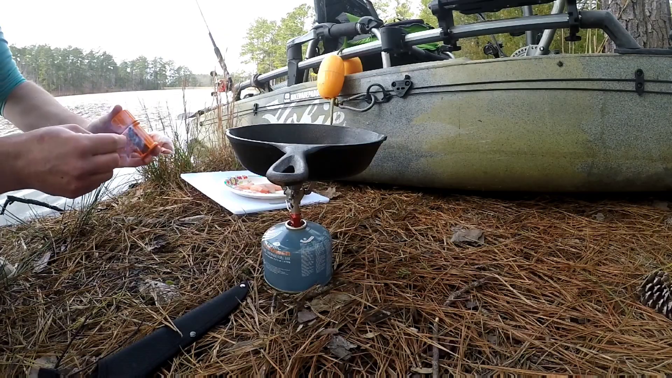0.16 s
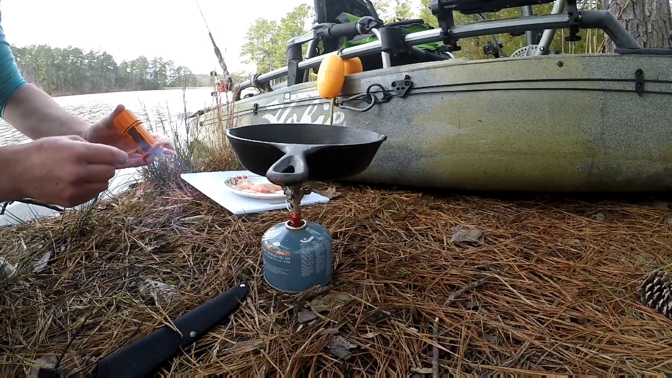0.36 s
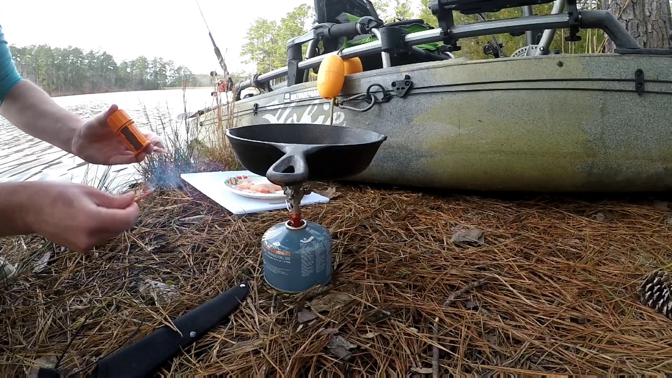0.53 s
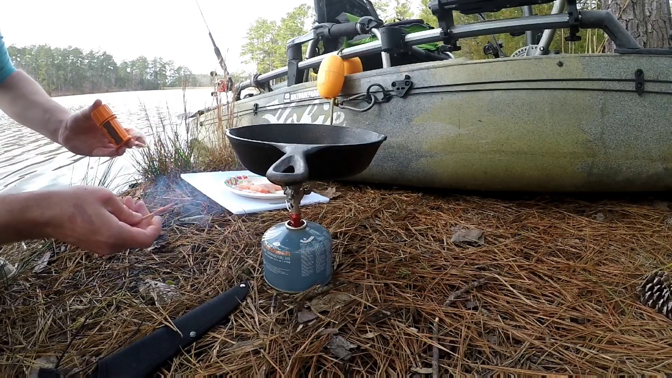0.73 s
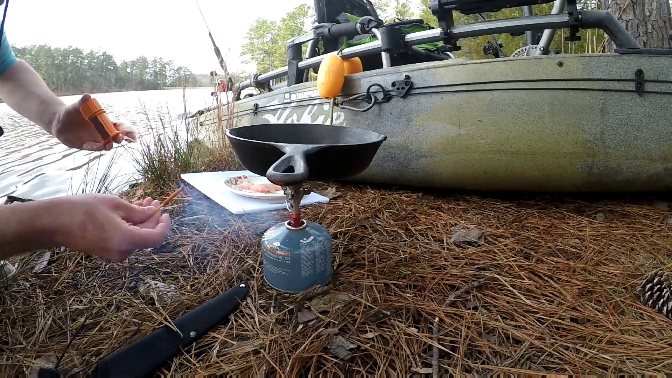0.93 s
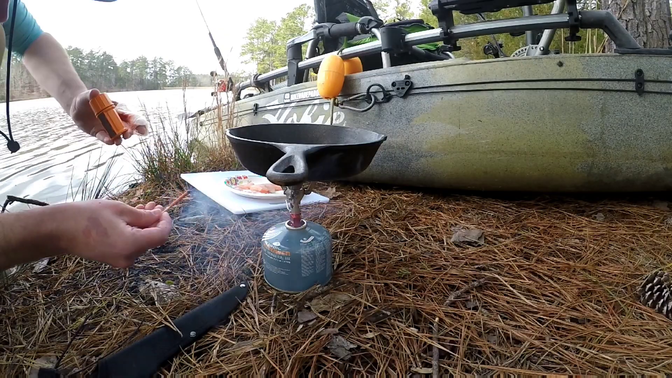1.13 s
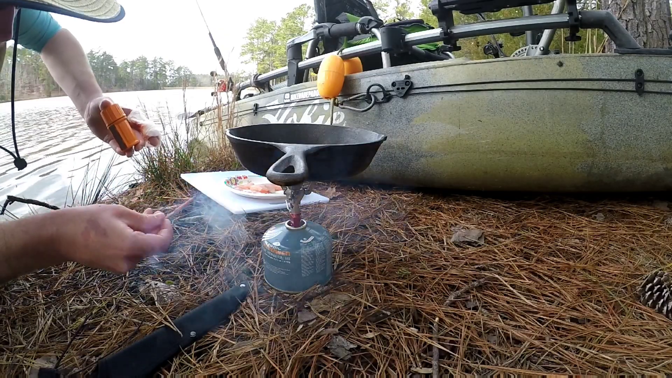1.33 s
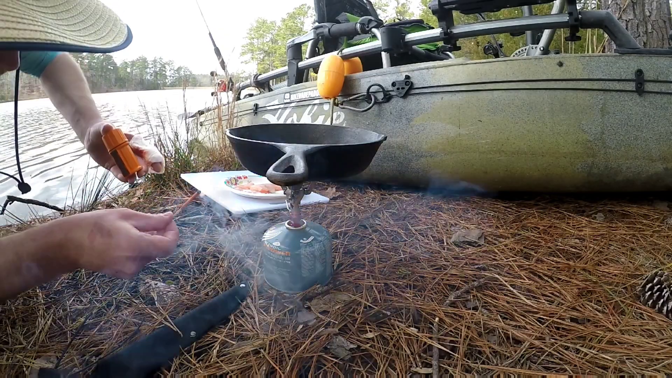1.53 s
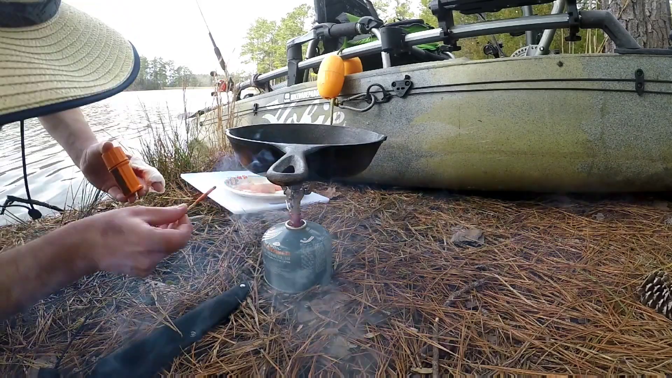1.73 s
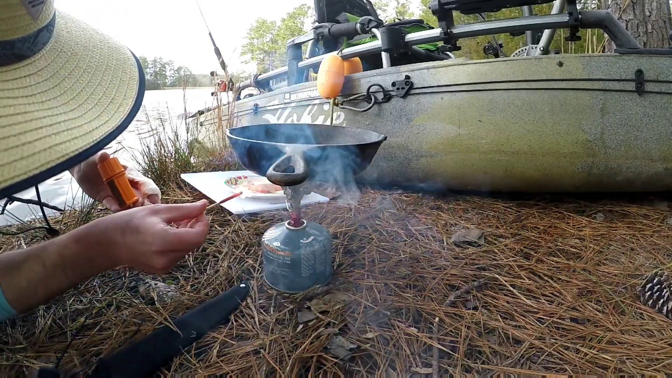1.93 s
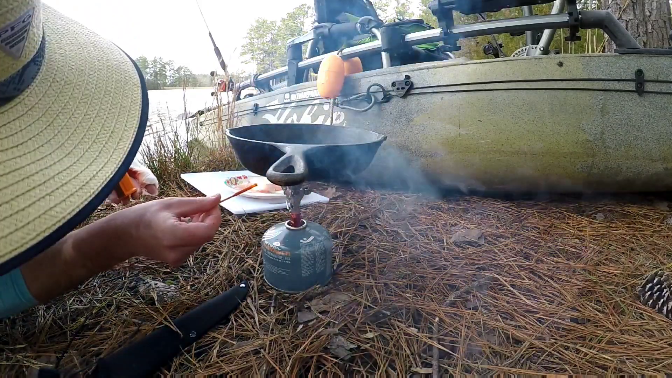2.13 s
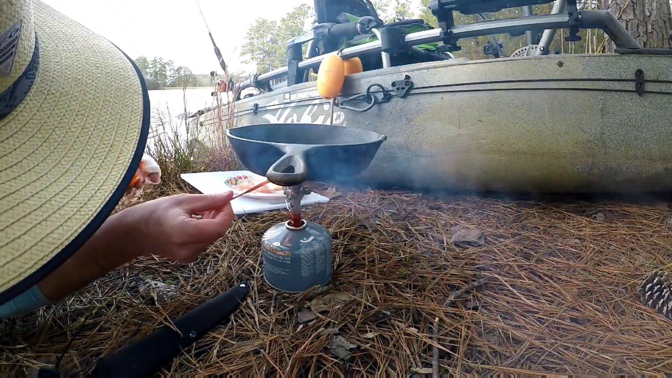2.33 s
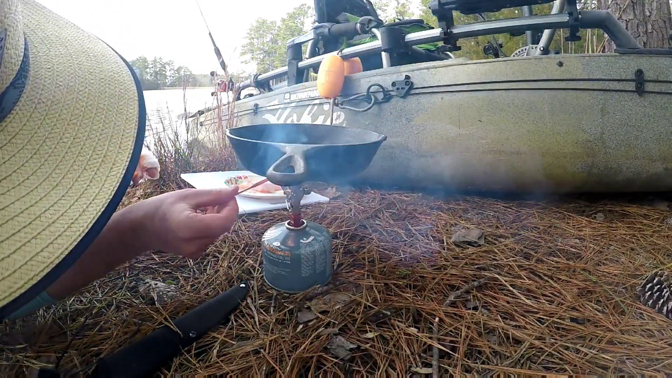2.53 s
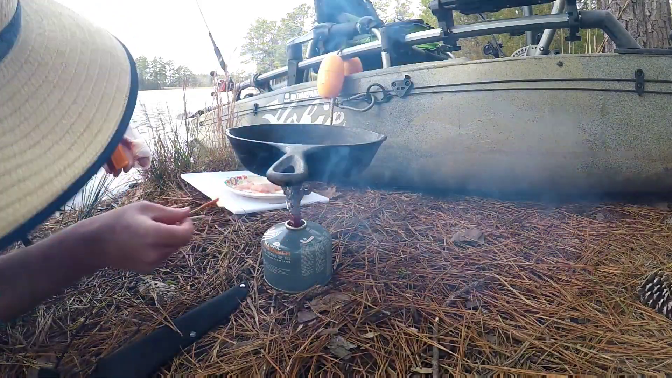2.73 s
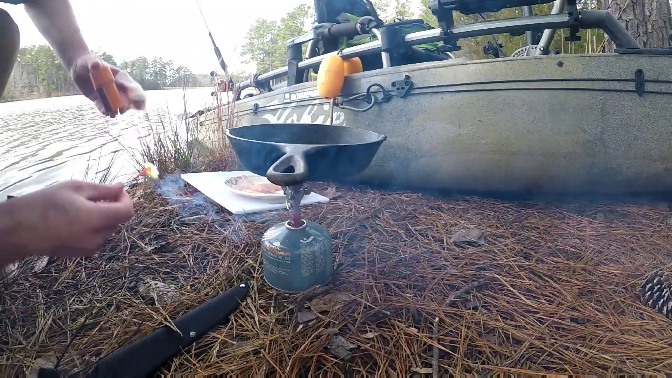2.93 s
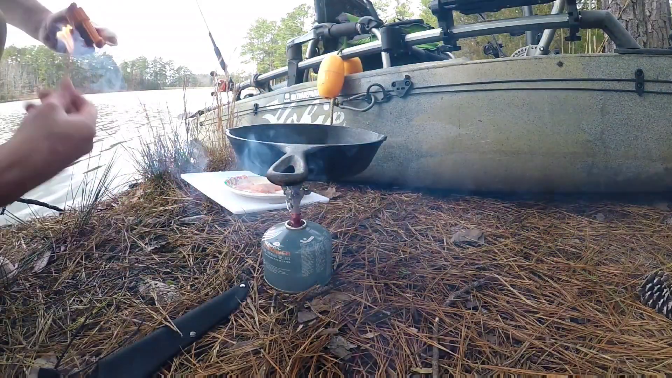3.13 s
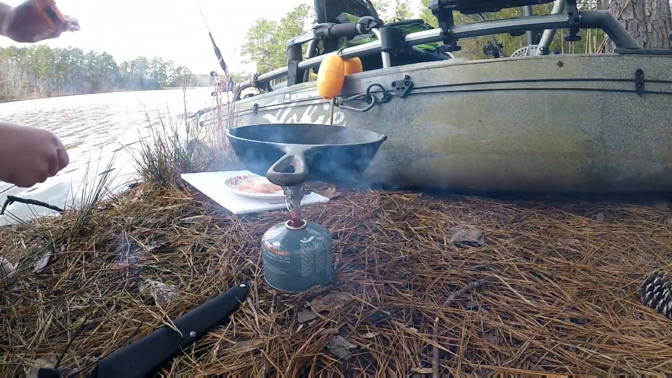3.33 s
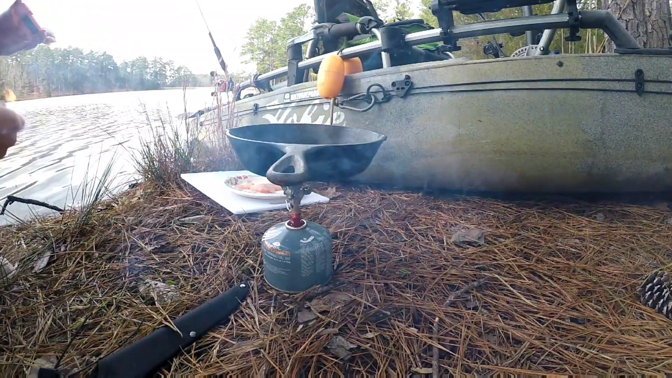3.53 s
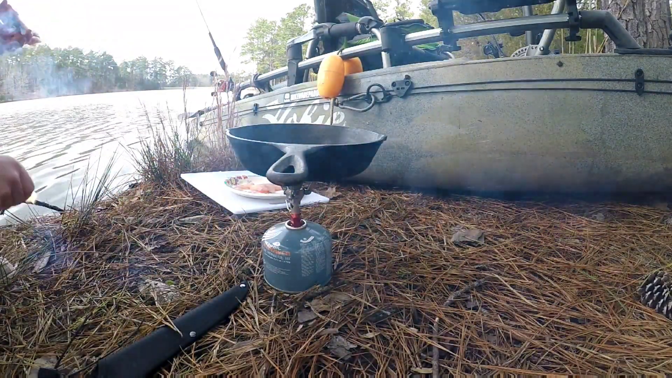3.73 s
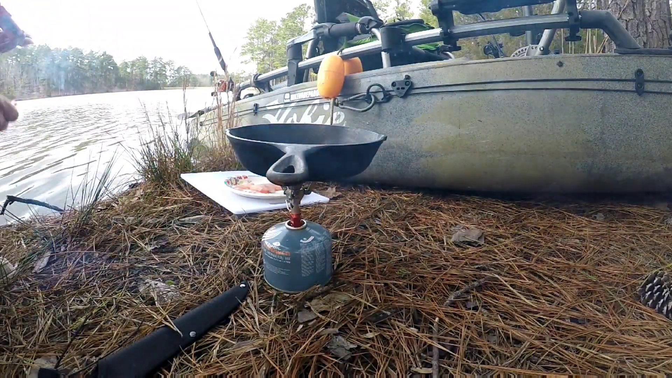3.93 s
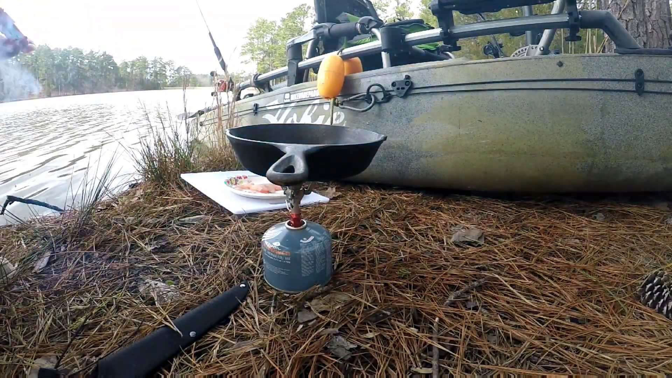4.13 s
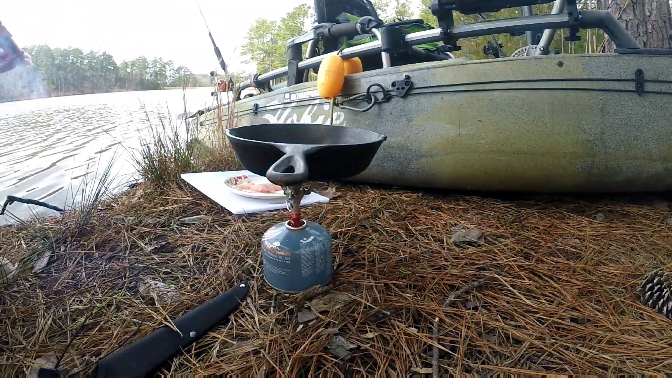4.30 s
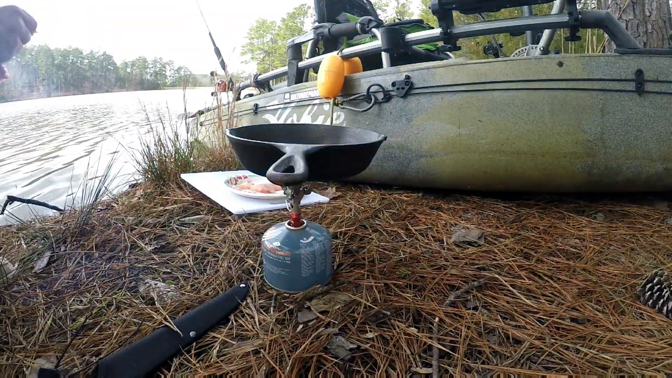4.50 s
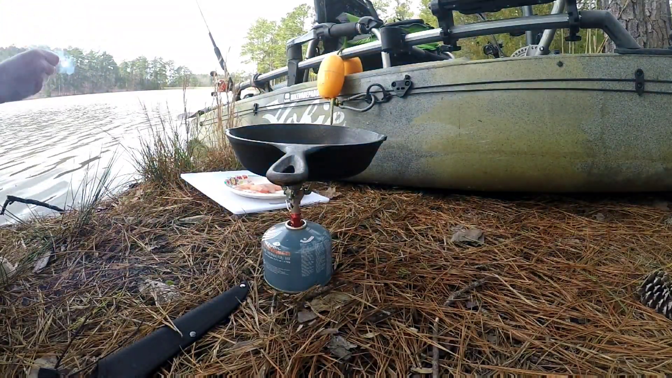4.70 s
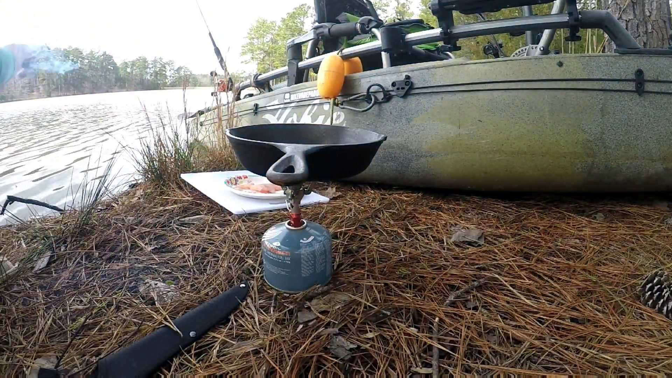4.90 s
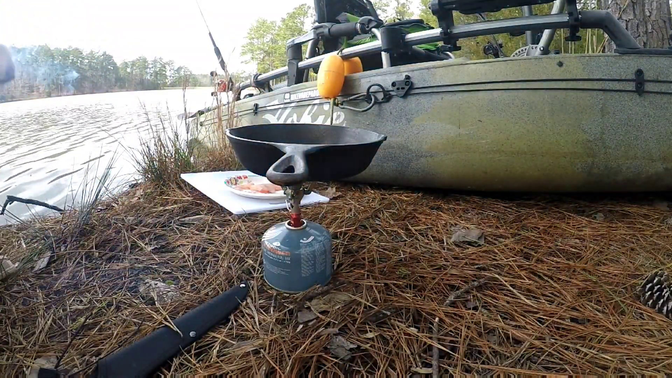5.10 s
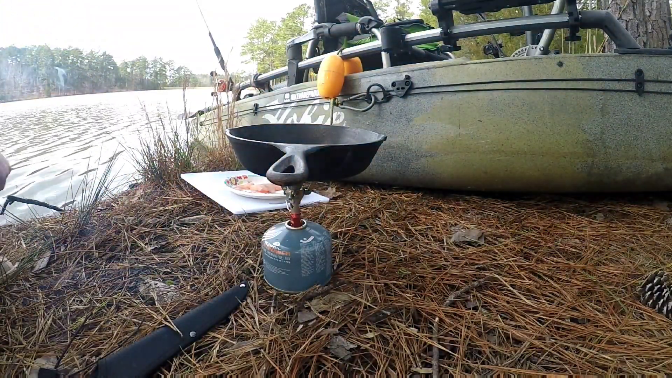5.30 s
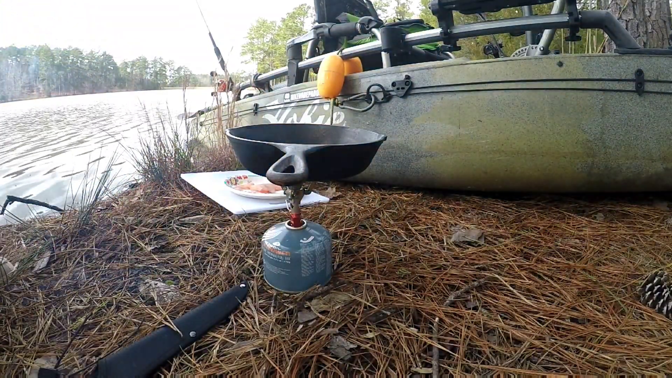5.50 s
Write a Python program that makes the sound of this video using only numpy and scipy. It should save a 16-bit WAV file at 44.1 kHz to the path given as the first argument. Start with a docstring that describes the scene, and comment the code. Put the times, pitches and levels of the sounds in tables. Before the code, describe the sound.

Outdoors by a lake, close to a small gas stove. Unlit gas hisses brightly with a faint whistle over a low wash of wind and water. A match fizzes and sputters, the gas catches with a soft deep pop, and the flame roars steadily under a pan to the end. Close stereo pickup with deep wind rumble filtered out.

```python
"""Lighting a small gas stove by a lake

Cold gas hisses from the jet over a low wash of wind and water: shaped noise, with a faint whistle.
A match hisses in the jet and sputters; the gas lights with a soft pop, a pressure pulse and decaying sines.
The flame then roars under a pan: boom, rumble, upper roar and hot hiss, all modulated noise.
Two microphone ports hear it with different levels, phases and coherence, behind a steep wind filter."""
import sys
import numpy as np
from scipy import signal
from scipy.fft import rfft, irfft, next_fast_len
from scipy.io import wavfile
from scipy.ndimage import uniform_filter1d

SR = 44100
rng = np.random.default_rng(int(sys.argv[2]) if len(sys.argv) > 2 else 0)


def wav_record(signal):
    """Record a signal, one row per channel, as 16-bit PCM in the file named by sys.argv[1]."""
    frames = np.transpose(np.atleast_2d(signal))
    bounded = np.clip(frames, -1, 1)
    # unit amplitude maps onto the largest positive 16-bit level
    quanta = np.round(bounded * 32767).astype(np.int16)
    wavfile.write(sys.argv[1], SR, quanta)


N = 244796
LONG = next_fast_len(N + 8192)  # samples worked on, with room for the filters to ring
T, HZ = np.arange(LONG) / SR, np.fft.rfftfreq(LONG, 1 / SR)
FADE = np.clip((LONG - 2048 - np.arange(LONG)) / 2048, 0, 1)  # falls to zero 2048 samples before the end


def amp(db):
    """Decibel law: level to amplitude gain."""
    return 10 ** (np.asarray(db) / 20)


def on_hz(table):
    """Interpolation on a logarithmic frequency axis, one curve for each column."""
    f, *columns = np.transpose(table)
    return np.squeeze([np.interp(np.log(HZ + 1), np.log(f), c) for c in columns])


def since(s):
    """Elapsed time in seconds after a moment, zero before it."""
    return np.maximum(T - s, 0)


def until(s):
    """Remaining time in seconds before a moment, zero after it."""
    return np.maximum(s - T, 0)


def colour(x, gain):
    """Linear filtering: each frequency is multiplied by its gain."""
    return irfft(rfft(x) * gain, LONG)


def hiss(gain):
    """Filtered white noise: two unrelated noises whose power per Hz is the gain squared."""
    return colour(rng.standard_normal((2, LONG)), gain * np.sqrt(SR / 2))


def evened(x):
    """Normalisation to rms 1."""
    return x / x.std()


def flicker(top_hz, low_hz=3):
    """Random modulation of rms 1: noise between two rates, strongest at the slowest."""
    gain = (HZ > low_hz) / np.sqrt(HZ + 1) / (1 + (HZ / top_hz) ** 2)
    return evened(colour(rng.standard_normal(LONG), gain))


def patches(width_hz, length_s):
    """Correlated random field over frequency and time, rms 1, for frames of 512 samples."""
    x = rng.standard_normal((257, LONG // 256 + 2))
    x = uniform_filter1d(x, max(1, round(width_hz * 512 / SR)), axis=0)
    x = uniform_filter1d(x, max(1, round(length_s * SR / 256)), axis=1)
    return evened(x)


def mottled(x, depth_db, width_hz, length_s):
    """Random modulation: bands of the noise swell and sink independently in level."""
    z = signal.stft(x, nperseg=512)[2]
    gain = amp(depth_db * patches(width_hz, length_s)[:, :z.shape[-1]])
    return signal.istft(z * gain, nperseg=512)[1][..., :LONG]


def ports(pair, table):
    """Partial coherence: right hears the first sound, left a phase-shifted copy mixed with the second."""
    level_db, lead, same = on_hz(table)
    same = np.clip(same, 0, 1)
    shared = colour(pair[0], same * np.exp(1j * lead))
    unrelated = colour(pair[1], np.sqrt(1 - same ** 2))
    return np.array([colour(shared + unrelated, amp(level_db)), pair[0]])


def air():
    """Broadband ambient noise: a lumpy low wash of wind and water under slow level modulation."""
    # spectrum of light wind and lake: f/Hz, relative level/dB per Hz
    air_spectrum = [(40, 16.5), (100, 9), (170, 0), (300, -1.5), (500, -7), (800, -5.5), (1300, -12),
                    (1800, -15.5)]
    # left port against right in the open air: f/Hz, level/dB, phase lead/rad, coherence (0-1)
    air_ports = [(171, -0.8, 0.39, 0.3), (305, -4, 0.06, 0), (472, -0.5, 4.17, 0.44), (784, -2, 3.12, 0.84),
                 (1290, 3.5, 2.6, 0.63), (1800, 3.5, 2.23, 0.62)]
    level_db = -71  # dB per Hz at 0 dB of the spectrum
    wash = hiss(amp(on_hz(air_spectrum)) / (1 + (HZ / 2500) ** 2))
    wash = mottled(wash, depth_db=1.35, width_hz=400, length_s=.084)
    return ports(wash * amp(level_db + .66 * flicker(top_hz=11)), air_ports)


def cold_jet():
    """Jet noise: escaping gas hisses, with a narrow-band whistle, until the flame front arrives."""
    # unlit gas leaving the burner holes: f/Hz, relative level/dB per Hz
    cold_spectrum = [(2000, -8), (2900, -8), (3380, -9), (3600, -2), (4300, -2), (4520, -12.5), (5400, 0),
                     (6000, -8.5), (6250, -14), (7200, -10), (7700, -12), (8300, -22), (9950, -13.5),
                     (11500, -33.5), (14200, -33.5)]
    # faint tone of the jet: f/Hz, bandwidth/Hz, rms level/dB when clearest
    whistle = (1270, 10, -62)
    cold_db = -71  # dB per Hz at 0 dB of the spectrum
    match_in_s, shade_db, shade_s = 2.06, -1.5, .05  # hand and match shade the jet; time constant
    end_s, dies_db_per_s = 2.468, 300  # the flame front reaches the burner holes
    clearest_s, half_s, sinks_by_db = .72, .4, -5  # whistle: time, time scale, change away from it

    shade = shade_db * (1 - np.exp(-since(match_in_s) / shade_s))
    change_db = shade - dies_db_per_s * since(end_s)

    below = 1 / (1 + (cold_spectrum[0][0] / (HZ + 1)) ** 4)  # little of the jet lies under its band
    jet = mottled(hiss(amp(on_hz(cold_spectrum)) * below), depth_db=.8, width_hz=400, length_s=.03)
    jet = jet * amp(cold_db + change_db + .3 * flicker(top_hz=40, low_hz=8))

    hz, width, db = whistle
    resonance = 1 / np.sqrt(1 + (2 * (HZ - hz) / width) ** 2)
    tone = hiss(resonance / np.sqrt(np.pi * width / 2))  # unit power over the line
    sinks_db = sinks_by_db * (1 - np.exp(-((T - clearest_s) / half_s) ** 2))
    return jet + tone * amp(db + sinks_db + change_db)


def match_and_spits():
    """Modulated jet noise: bright hiss around the match, and grainy bursts that decay exponentially."""
    # hot jet torn by the match: f/Hz, relative level/dB per Hz
    match_spectrum = [(4000, -4.5), (5000, -2), (5800, -3.5), (6300, 4.5), (6800, -2.5), (7200, -6.5),
                      (8000, -12.5), (9500, -31), (11000, -42)]
    # match hiss, swelling in the flame until it is drawn out: t/s, level/dB per Hz before flicker
    match_level = [(2.02, -110), (2.07, -81), (2.44, -82.5), (2.51, -75.5), (2.7, -74.5), (2.85, -72.5),
                   (3.05, -73.5), (3.13, -74), (3.22, -82), (3.33, -84), (3.5, -95), (5.55, -110)]
    # sputter spectrum: f/Hz, relative level/dB per Hz
    spit_spectrum = [(4000, -16), (5200, -4), (5700, -5.5), (7000, -8.5), (8300, -16.5), (9800, -8),
                     (11300, -19.5), (14000, -24)]
    # bright sputters: t/s, onset level/dB per Hz before the grain, decay time T60/s, bottom f/Hz, top f/Hz
    spits = [(2.022, -69, .16, 4500, 14000), (2.032, -67, .14, 4500, 14000),
             (2.051, -64.5, .16, 4500, 13000), (2.066, -67.5, .2, 5000, 12000),
             (2.112, -70, .22, 5500, 11500), (2.14, -72, .15, 5500, 11000), (2.19, -73, .1, 6000, 11000),
             (3.795, -68, .15, 10000, 13000), (5.263, -56, .1, 7000, 8800)]
    rise_s = .003  # time constant

    above = 1 / (1 + (3500 / (HZ + 1)) ** 4)
    level_db = np.interp(T, *np.transpose(match_level)) + 1.1 * flicker(top_hz=40)
    out = hiss(amp(on_hz(match_spectrum)) * above) * amp(level_db)

    grain_db = 2.5 * flicker(top_hz=900, low_hz=60)  # shared by all sputters
    shape = amp(on_hz(spit_spectrum))
    for s, db, t60, low_hz, top_hz in spits:
        t = since(s)
        envelope = amp(db + grain_db - 60 * t / t60) * (1 - np.exp(-t / rise_s))
        band = shape / (1 + (HZ / top_hz) ** 8) / (1 + (low_hz / (HZ + 1)) ** 8)
        out = out + mottled(hiss(band), depth_db=3, width_hz=1500, length_s=.006) * envelope
    return out


def pop():
    """Expansion and resonance: a pocket of gas swells and falls back; the flame front rings the gap."""
    # gap under the pan, the deepest ring starting last:
    # f/Hz, level/dB before decay and build-up, decay time T60/s, delay after the flame front/ms
    pop_rings = [(177, -21, .05, 5.3), (335, -19, .04, .4), (533, -14, .042, .85), (1090, -27, .016, .4),
                 (1500, -26, .014, 0), (1810, -25, .014, 0), (2070, -31, .022, 2.5)]
    pop_s, pop_db, pop_ms = 2.478, 5.3, 2.62  # centre, scale of the pulse in level and in time
    front_s = 2.4758  # the flame front runs out
    rise_cycles = .3  # each ring builds up with this time constant
    crack_db, crack_t60, crack_hz, crack_rise_s = -67, .035, 2200, .0017  # rush of the front, dB per Hz

    u = (T - pop_s) * 1000 / pop_ms
    push = -amp(pop_db) * u * np.exp(-u ** 2)

    rings = 0
    for hz, db, t60, late_ms in pop_rings:
        t = since(front_s + late_ms / 1000)
        envelope = amp(db - 60 * t / t60) * (1 - np.exp(-t * hz / rise_cycles))
        rings = rings + envelope * np.sin(2 * np.pi * hz * t)

    t = since(front_s)
    envelope = amp(crack_db - 60 * t / crack_t60) * (1 - np.exp(-t / crack_rise_s))
    crack = hiss(1 / (1 + (HZ / crack_hz) ** 6)) * envelope
    return crack + np.array([push + rings, 0 * t])  # the pulse and rings have no unrelated part


def flame():
    """Combustion noise: slow flutter moves boom, rumble and upper roar; quick flutter roar and hot hiss."""
    # turbulent flame, booming in the gap under the pan: f/Hz, relative level/dB per Hz
    roar_spectrum = [(170, -3.5), (260, -6.5), (400, -2.5), (500, -3.5), (620, -8), (800, -21), (950, -23),
                     (1200, -19), (1500, -20.5), (2000, -25), (2600, -26)]
    # uneven level of the roar, rising and falling irregularly (before flutter and onset):
    # t/s, boom rms level/dB, upper roar rms level/dB
    roar_level = [(2.5, -25.5, -33.5), (2.6, -32, -33), (2.72, -25, -31), (2.85, -29.5, -31),
                  (2.96, -29.5, -34), (3.05, -28.5, -33), (3.3, -28.5, -31.5), (3.36, -30, -31),
                  (3.45, -28.5, -32.5), (3.86, -30.5, -31), (3.92, -26.5, -31), (4.04, -32.5, -31.5),
                  (4.16, -28, -30), (4.3, -31, -31), (4.4, -27.5, -29.5), (4.48, -33, -29),
                  (4.57, -29, -31), (4.83, -28, -31), (4.9, -33, -31), (4.97, -28.5, -30), (5.4, -29, -29),
                  (5.55, -28.5, -30)]
    # the same jet once it is hot: f/Hz, relative level/dB per Hz
    lit_spectrum = [(2600, -2.5), (3400, -5.5), (3900, -3.5), (4130, -6), (4400, -2.5), (5100, -2.5),
                    (5600, -1), (6000, -10), (6500, -3.5), (7300, -2.5), (7550, -6), (7800, -6),
                    (8100, -12), (8900, -13.5), (9800, -11.5), (10500, -16), (11500, -26.5), (14200, -31.5)]
    # hot hiss, swelling and sinking slowly: t/s, level/dB per Hz before flutter and onset
    hot_level = [(2.5, -76), (3.1, -75.5), (3.45, -76.5), (3.62, -75), (3.78, -76), (3.92, -73.5),
                 (4.3, -75), (4.8, -74.5), (5.1, -74), (5.55, -74.5)]
    light_s, catch_db_per_s = 2.485, 3000  # the flame stands at this time after a steep rise
    boom_lag_db, boom_lag_s = -5, .025  # after the pop the boom gathers itself
    hot_lag_db, hot_lag_s = -6, .03  # late start of the hot hiss
    rumble_db, hold_s, dies_db_per_s, rest_db = -43.5, .5, 14, -64  # the young flame flaps, dB per Hz
    young_db, young_hz, settle_s = -2.5, 715, .76  # the young flame is dull at the top of its roar

    age, catch_db = since(light_s), -catch_db_per_s * until(light_s)
    slow, quick = flicker(top_hz=30, low_hz=5), flicker(top_hz=90, low_hz=6)
    s, *levels = np.transpose(roar_level)
    boom_db, upper_db = (catch_db + np.interp(T, s, db) for db in levels)

    roar = amp(on_hz(roar_spectrum)) / (1 + (HZ / 2800) ** 6) * (HZ > 110)  # the rumble lies below
    high = 1 / (1 + (330 / (HZ + 1)) ** 4)  # share of the roar above the boom
    boom_db = boom_db + boom_lag_db * np.exp(-age / boom_lag_s)
    boom = evened(hiss(roar * (1 - high))) * amp(boom_db + .49 * slow)

    upper = evened(hiss(roar * high))
    top = colour(upper, 1 / (1 + (young_hz / (HZ + 1)) ** 6))
    upper = upper + top * (amp(young_db * np.exp(-age / settle_s)) - 1)
    upper = upper * amp(upper_db + .59 * slow + .55 * quick)

    hiss_db = catch_db + np.interp(T, *np.transpose(hot_level)) + hot_lag_db * np.exp(-age / hot_lag_s)
    hot = hiss(amp(on_hz(lit_spectrum)) / (1 + (2400 / (HZ + 1)) ** 6))
    hot = mottled(hot, depth_db=.72, width_hz=600, length_s=.06) * amp(hiss_db + .4 * quick)

    flaps_db = np.maximum(rumble_db - dies_db_per_s * since(light_s + hold_s), rest_db)
    rumble = hiss(1 / (1 + (HZ / 110) ** 4)) * amp(catch_db + flaps_db + 2 * slow)
    return boom + upper + hot + rumble


def body(x):
    """Resonance: burner and pan raise or lower narrow bells of the spectrum."""
    # resonances on all that the stove sends out: f/Hz, width/Hz, gain/dB
    bells = [(172, 40, 2), (415, 30, -2.5), (480, 70, 3), (560, 50, 1.5), (632, 30, -3), (700, 60, 1.5),
             (965, 40, -3), (1190, 70, 2), (1330, 220, 2.5), (1740, 110, 3), (2070, 110, 3.5),
             (2400, 90, -3), (2590, 130, 3.5), (2840, 90, -3), (3180, 190, 5.5), (3390, 90, -2),
             (3630, 120, 3.5), (3970, 110, 3), (4730, 170, 4.5), (6470, 150, 2.5), (7330, 150, 2)]
    gain_db = sum(db * np.exp(-(2 * (HZ - hz) / width) ** 2 / 2) for hz, width, db in bells)
    return colour(x, amp(gain_db))


def scene():
    """Superposition: cold jet, match and flame each reach the two ports in their own way."""
    # left port against right, for three sources: f/Hz, level/dB, phase lead/rad, coherence (0-1)
    # the cold jet, which beams differently from the flame
    cold_ports = [(1200, -12.5, 2.5, 0.51), (2000, -1, 2, 0.97), (2640, -5, -0.5, 0.21),
                  (3520, 1.5, .5, 0.99), (3800, -2, 0.87, 1), (4330, -3, -0.1, 0.9),
                  (4830, 1.5, -0.6, 0.86), (5400, -10.5, -2, 1), (5750, -18, 4, .3), (5900, -8, -2.5, .35),
                  (6200, -3, -2, .2), (6800, -3, -3, 0.45), (7550, -10.5, 2.5, .3), (8600, 1.5, -1.5, .05),
                  (9350, -4, 0.5, .6), (9800, -8.5, .5, .5), (10500, -2, 1, .05), (12100, -1.5, 0.5, .55)]
    # the match and the sputters, heard mostly from the right
    match_ports = [(4020, -4, 0.25, 0.82), (5340, -9, -.6, 0.86), (5800, 0, -.5, 0.97),
                   (6400, -13.5, -.2, 0.98), (7000, -11, -.1, .65), (8000, -7, .6, .5), (8500, -6, .3, .4),
                   (9800, -6, .1, 0.67), (12000, -3, 0, .4)]
    # the lit stove
    lit_ports = [(40, -.5, 0, .92), (150, -6, -.3, .98), (350, -10, .15, .97), (550, -17.5, 1.3, .9),
                 (900, -1, 2.3, .88), (1200, -3.5, 1.55, .88), (2300, 0, 1.6, .65), (2550, -5.5, .6, .6),
                 (2900, -1, .9, .7), (3900, 0, .25, .92), (4800, -3, -.1, .75), (5420, -10.5, -.5, .35),
                 (5750, -2, -2.2, .4), (6050, 0, -1.5, .1), (6350, -2, 0, .6), (6900, -10.5, .1, .3),
                 (7400, -10.5, .2, .5), (8300, -2, 0, .35), (9200, -1.5, 0, .55), (9900, -5.5, .3, .3),
                 (13000, -.5, 0, .55)]
    stove = ports(cold_jet(), cold_ports) + ports(match_and_spits(), match_ports)
    lit = ports((pop() + flame()) * FADE, lit_ports)  # faded so that its end cannot wrap round
    return (body(stove + lit) + air())[:, :N]


def record(dry):
    """Zero-phase filtering: a steep wind filter rings on both sides of the pop; then the band limit."""
    cut_hz, cut_width_hz, cut_db = 126.6, 9.35, -37
    edge_hz = 14650
    padded = np.pad(dry, ((0, 0), (4096, LONG - N - 4096)), "reflect") * np.minimum(FADE, FADE[::-1])
    steps = np.minimum((HZ - cut_hz) / cut_width_hz, 50)  # limited to keep the exponential finite
    cut = colour(padded, amp(cut_db / (1 + np.exp(steps))))
    band = signal.firwin(601, edge_hz, window=("kaiser", 9), fs=SR)
    return signal.oaconvolve(cut, band[None], "same")[:, 4096:4096 + N]


dry = scene()
out = record(dry)
wav_record(out)
```